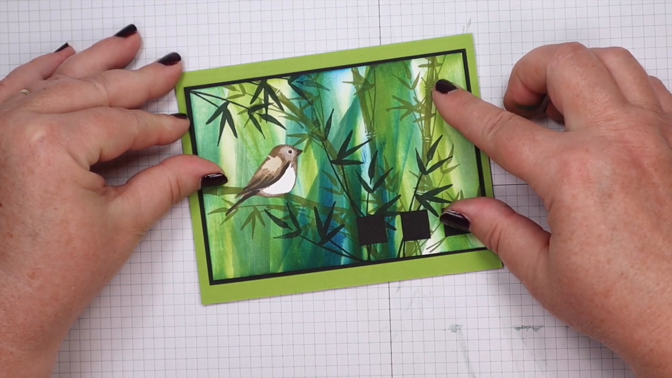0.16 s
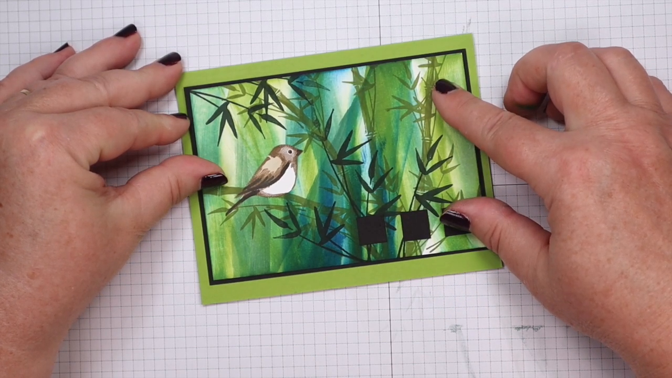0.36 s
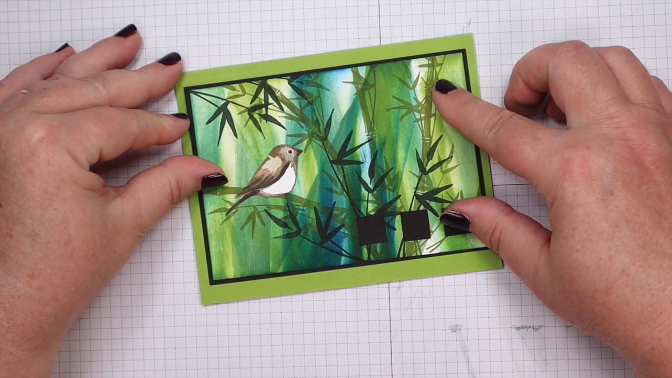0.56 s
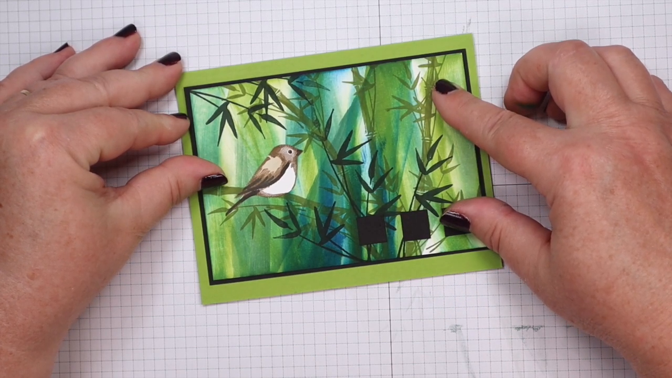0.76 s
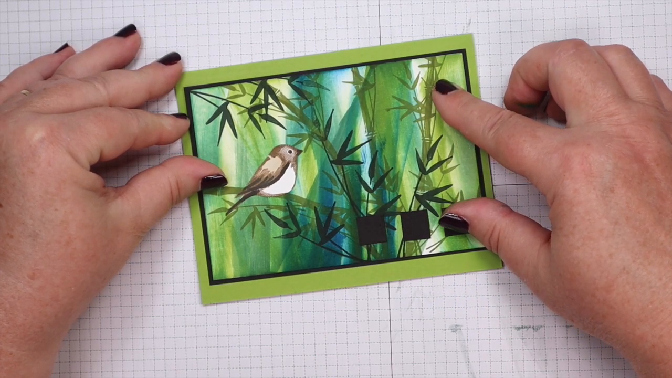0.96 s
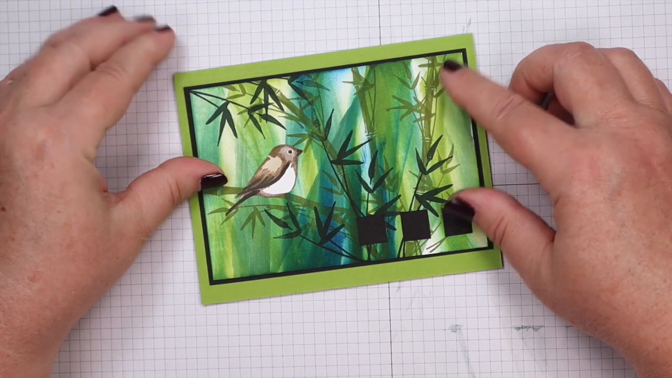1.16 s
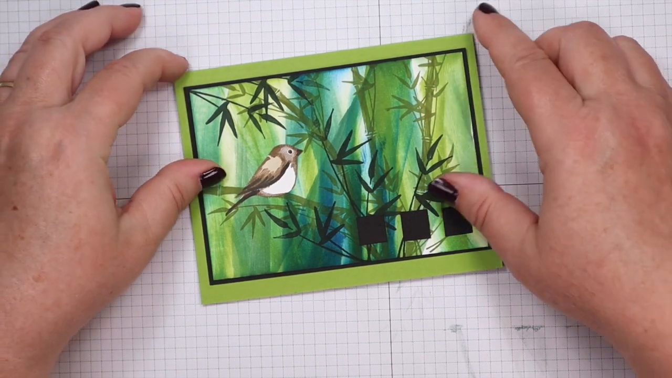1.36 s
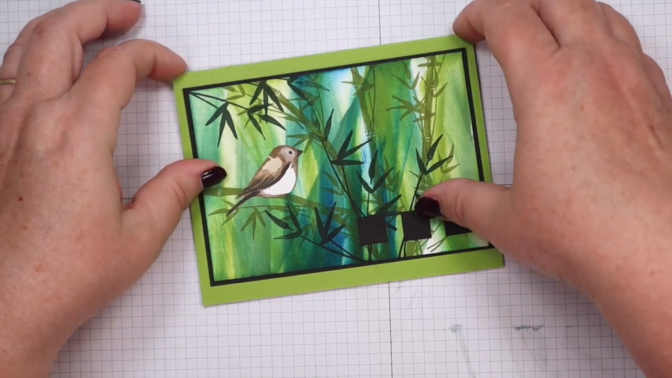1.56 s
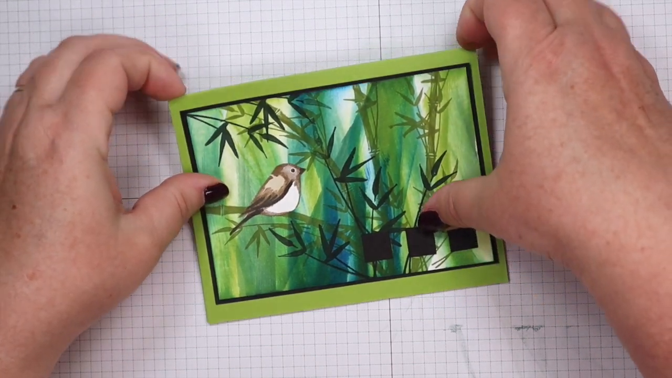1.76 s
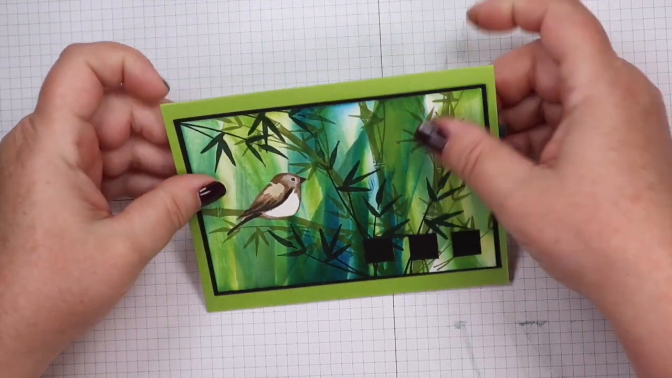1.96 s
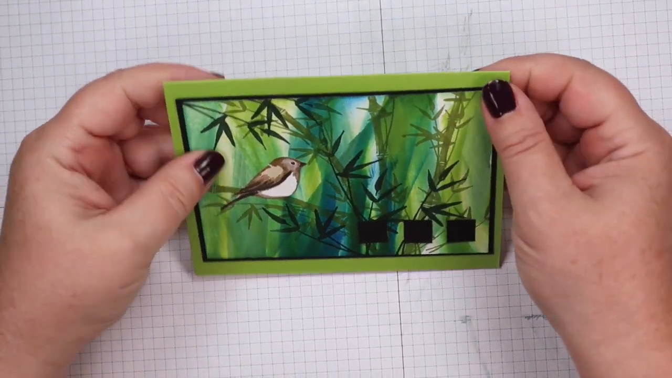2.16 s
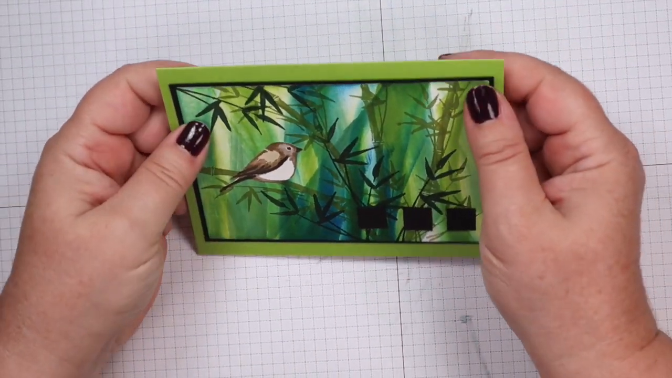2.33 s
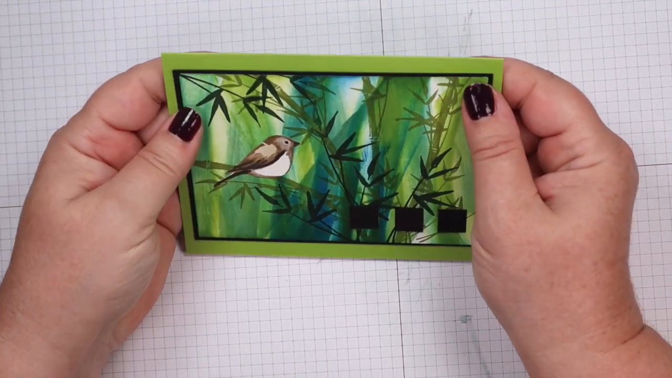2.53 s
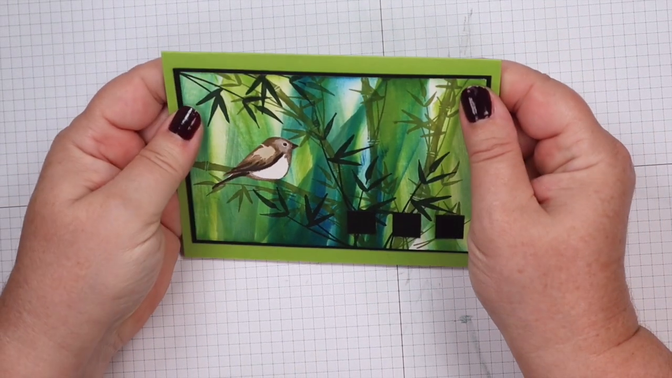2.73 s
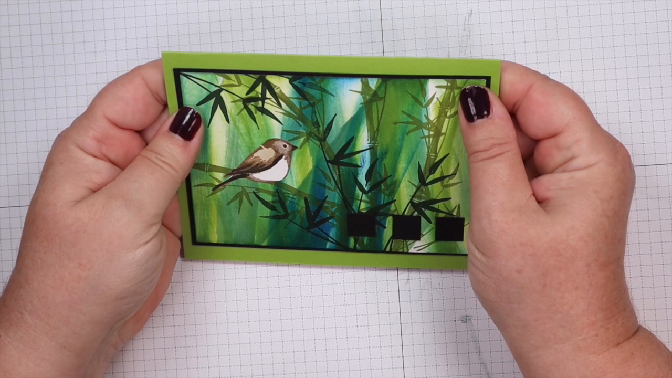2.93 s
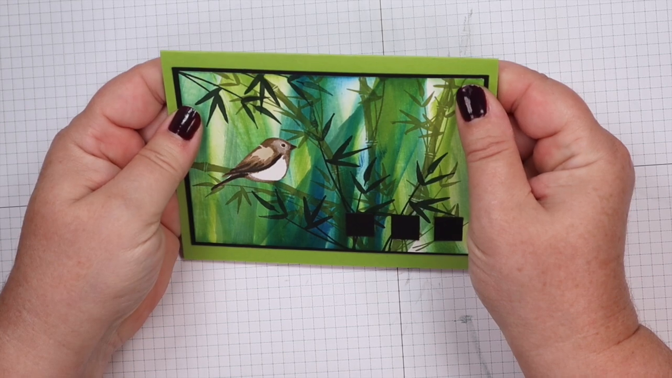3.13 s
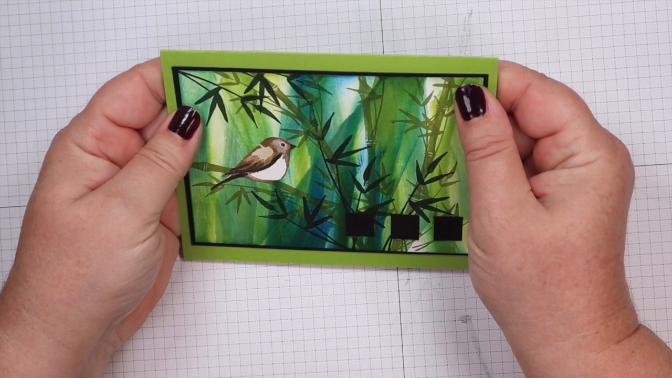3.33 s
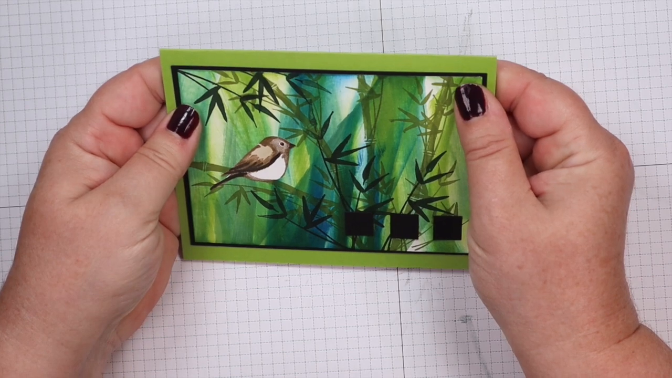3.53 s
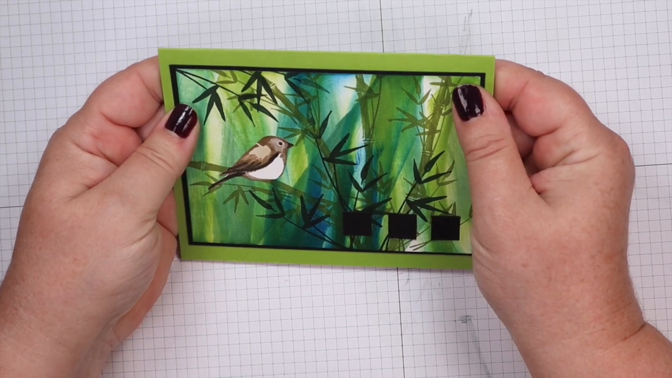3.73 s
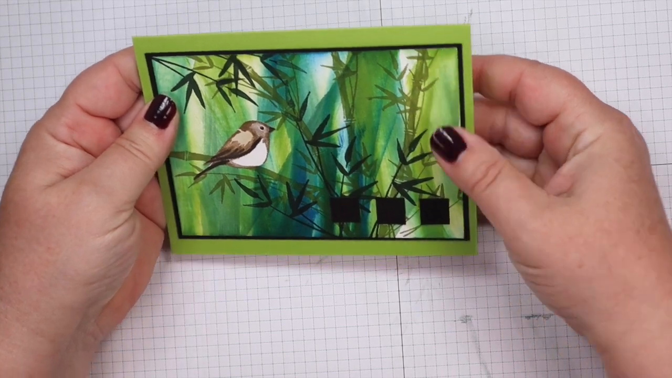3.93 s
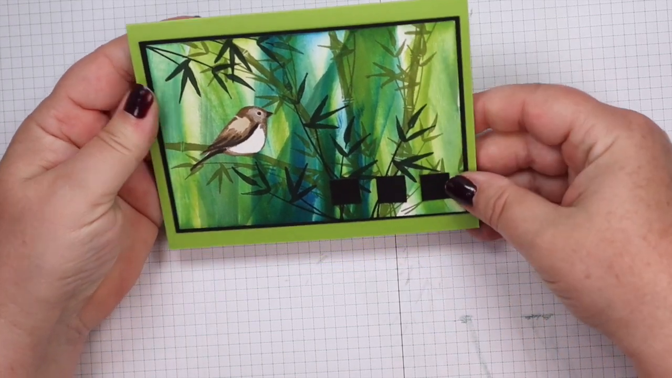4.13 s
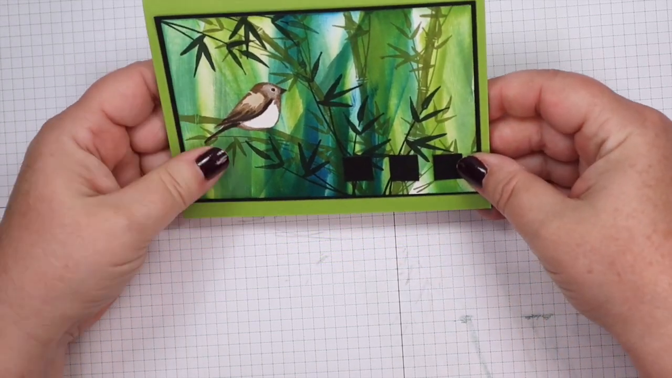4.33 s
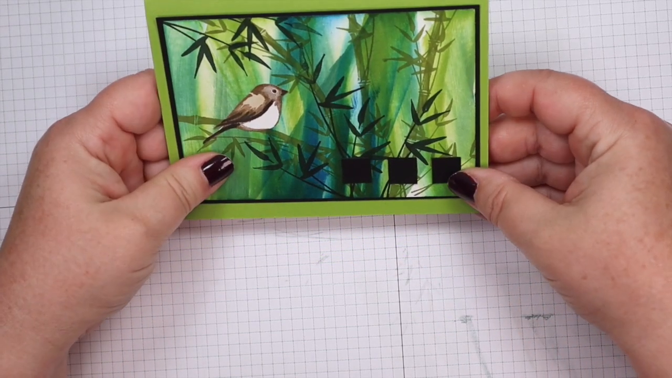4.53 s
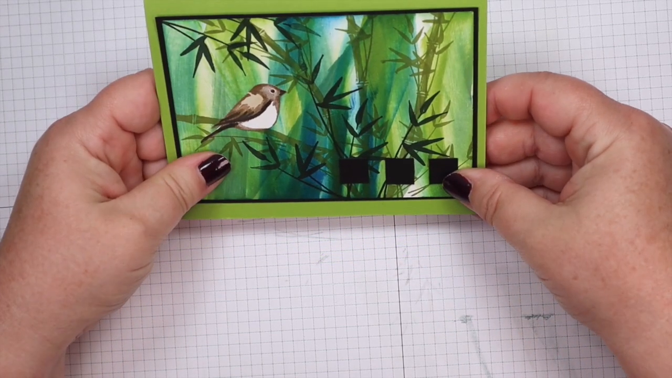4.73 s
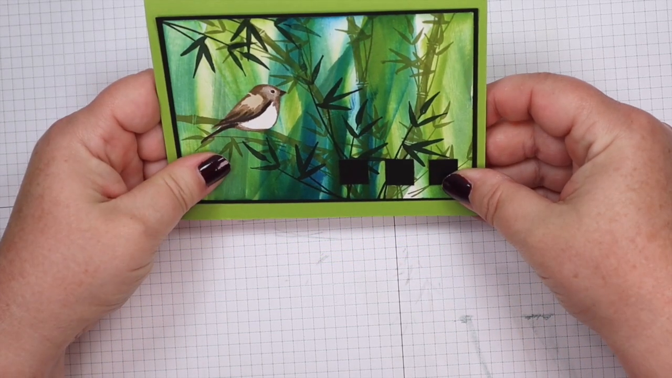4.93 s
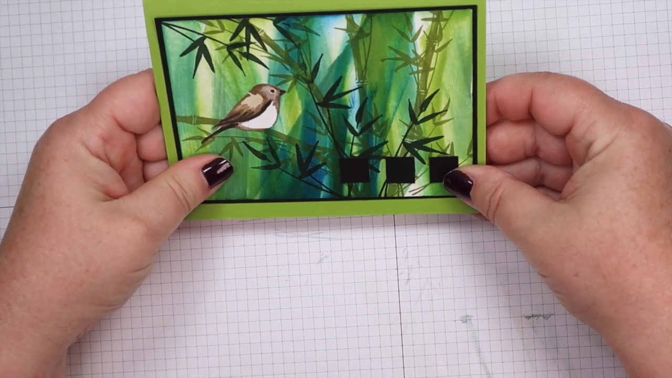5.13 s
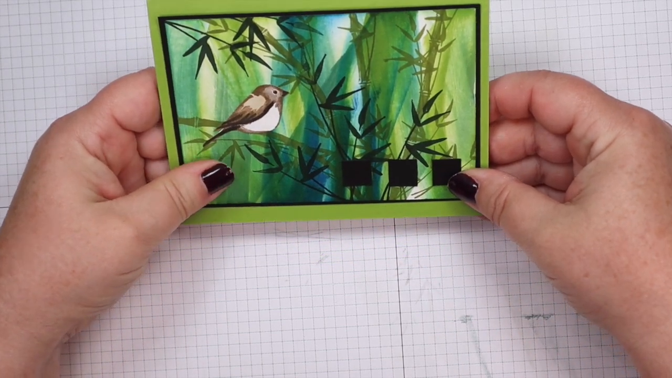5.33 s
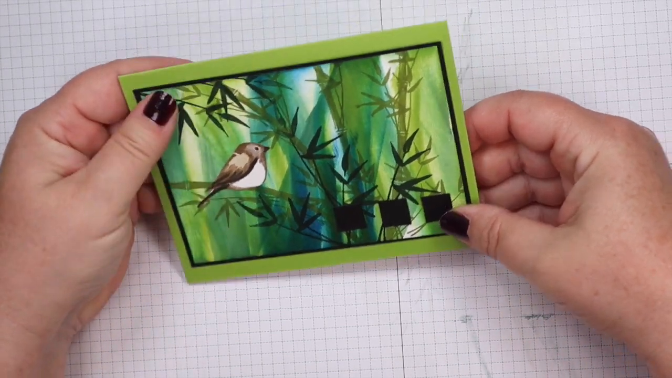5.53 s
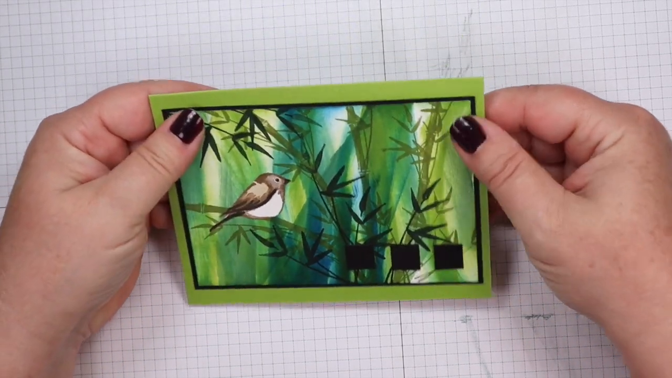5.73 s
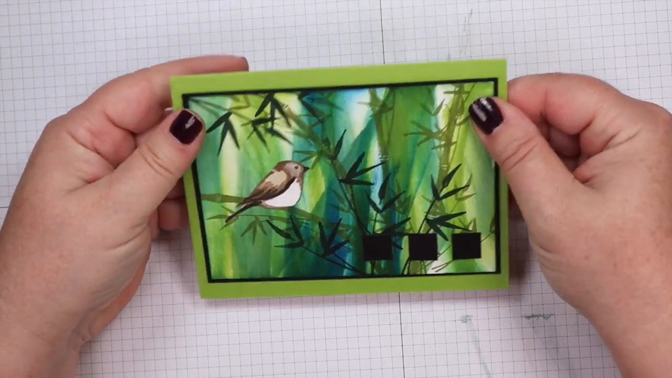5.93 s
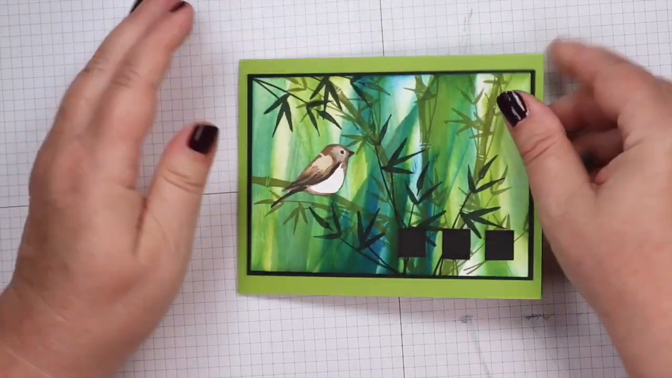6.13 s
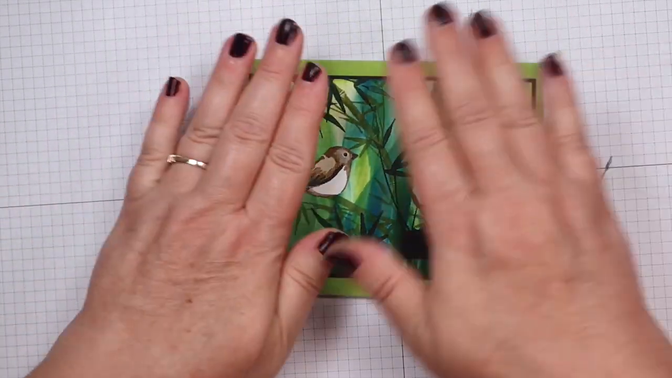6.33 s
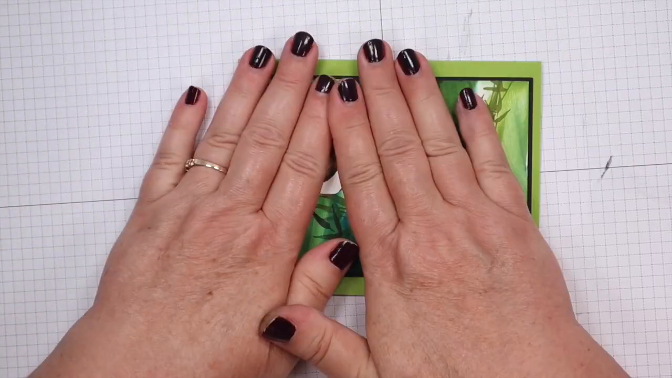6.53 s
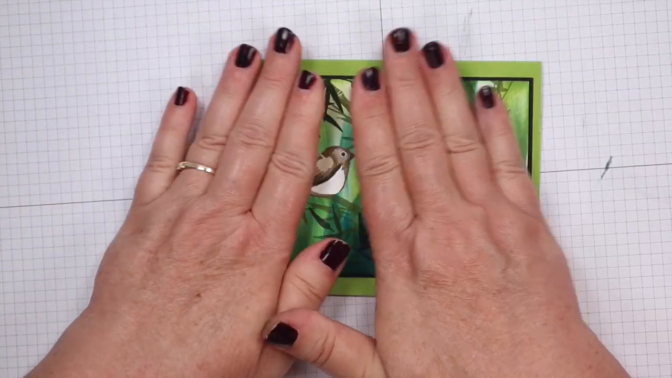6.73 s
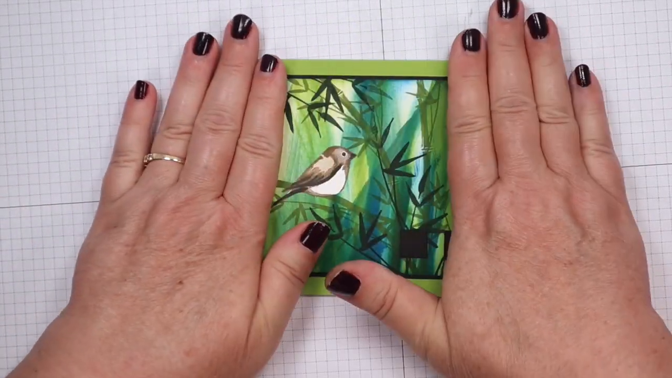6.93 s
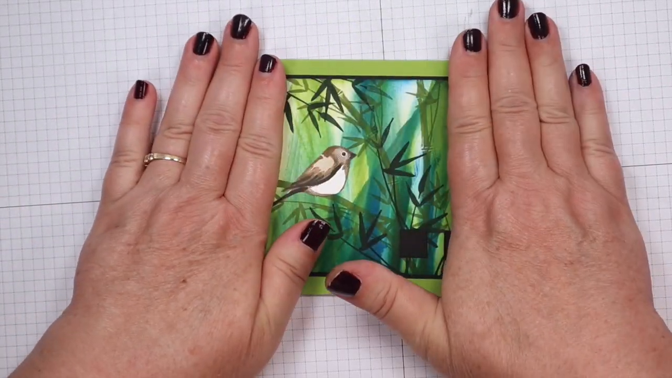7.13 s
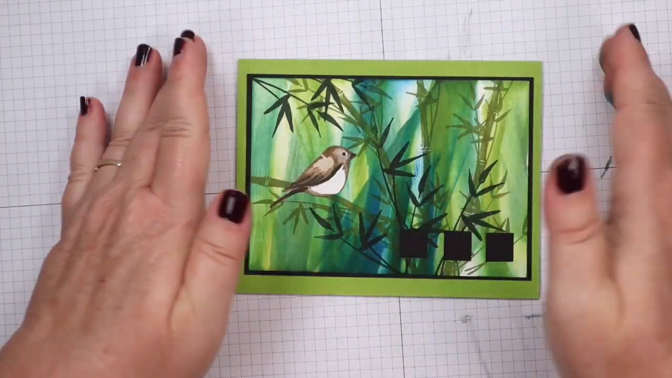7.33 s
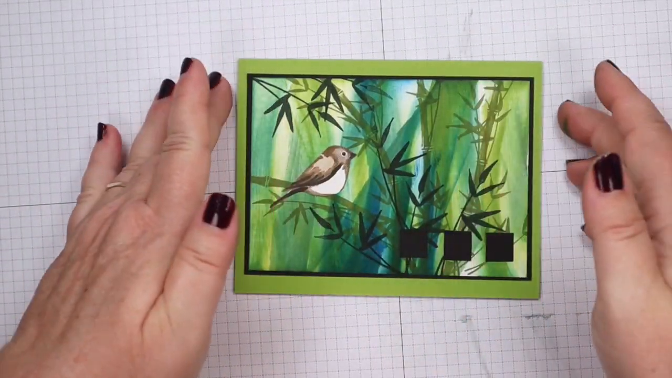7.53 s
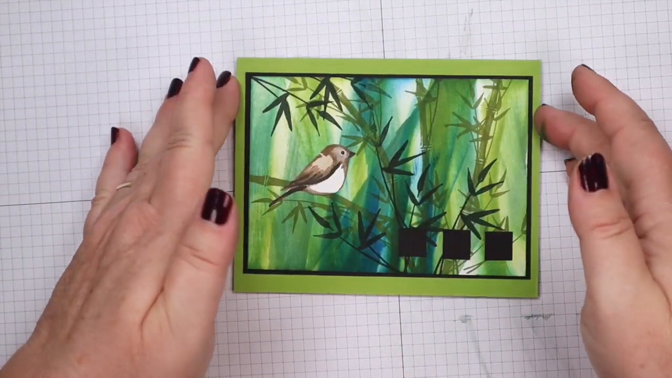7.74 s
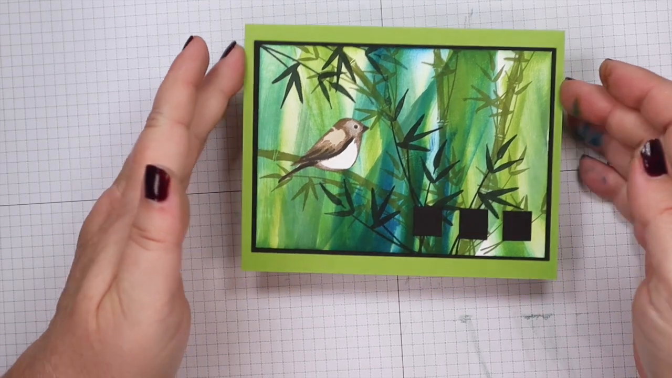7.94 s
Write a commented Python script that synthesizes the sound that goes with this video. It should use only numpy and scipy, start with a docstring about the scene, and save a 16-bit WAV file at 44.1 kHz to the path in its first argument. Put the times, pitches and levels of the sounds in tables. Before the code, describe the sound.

Paper card softly scuffed, tapped and turned by fingers, set down with a sharp click and pressed with thuds, over a steady low mains hum.

```python
"""A mains hum with a faint buzz runs through a small quiet room, with air hiss and a wavering drone.
Two hands lift a layered paper card off a craft mat, turn it, lay it down, press it flat and pick it up.
Taps are clicks and scuffs through the card's resonances; rubbing is grains of friction shaped by strokes.
Presses thud in the table top and shake the camera mount, dragged skin makes bending modes sing, and
fingernails flick the stiff edge so that its damped modes ring."""
import sys
import numpy as np
from scipy import signal
from scipy.fft import rfft, irfft
from scipy.io import wavfile
from scipy.ndimage import uniform_filter1d

SR = 44100
rng = np.random.default_rng(int(sys.argv[2]) if len(sys.argv) > 2 else 0)


def store_pcm(level_fs):
    """Save levels as 16-bit WAV."""
    pcm = np.round(np.clip(level_fs, -1, 1) * 32767).astype(np.int16)
    wavfile.write(sys.argv[1], SR, np.atleast_2d(pcm).T)


N = 356636
TIME, BINS = np.arange(N) / SR, np.fft.rfftfreq(N, 1 / SR)  # s, Hz


def amp(db):
    """Decibel law: converts a level to an amplitude gain."""
    return 10 ** (np.asarray(db) / 20)


def unit(x):
    """Normalization: scales a signal to rms 1."""
    return x / np.sqrt(np.mean(x ** 2) + 1e-20)


def read(points, hz):
    """Spectral interpolation: reads a curve on a log-frequency axis."""
    f, value = np.transpose(points)
    return np.interp(np.log(hz + 1), np.log(f + 1), value)


def add(mix, start_s, sound):
    """Superposition: adds a sound into the mix at its start time."""
    part = mix[round(start_s * SR):][:len(sound)]
    part += sound[:len(part)]


def colour(x, db):
    """Linear filtering: weights a full-length signal's spectrum, then sets rms 1."""
    return unit(irfft(rfft(x) * amp(db), N))


def wander(rate_hz):
    """Low-passed noise: a slow random fluctuation of rms 1."""
    return colour(rng.standard_normal(N), -10 * np.log10(1 + (BINS / rate_hz) ** 6))


def causal(db):
    """Minimum phase: the sharp-fronted impulse response of a spectrum, with energy 1."""
    log_gain = np.log(amp(np.r_[db, db[-2:0:-1]]))
    response = np.fft.ifft(np.exp(np.conj(signal.hilbert(log_gain)))).real
    return response / np.linalg.norm(response)


def lift_db(resonances, hz):
    """Resonance: each entry lifts, or if negative cuts, a band around its centre."""
    return sum(db / (1 + (2 * (hz - f) / width) ** 2) for f, width, db in resonances)


MAINS_HZ = 59.993
# strong odd harmonics of the mains: pitch_hz, level_db (rms of a line at that pitch)
HUM_ODD = [(60, -40.5), (180, -51), (300, -59), (420, -69.5), (540, -76.5), (660, -72.5), (780, -75.5),
           (900, -80.5), (1140, -83), (1450, -94.5), (1750, -87), (2250, -100), (2700, -93), (4000, -108)]
# weak even harmonics of the mains: pitch_hz, level_db (rms of a line at that pitch)
HUM_EVEN = [(120, -79.5), (240, -76), (360, -76.5), (480, -85.5), (840, -84.5), (1200, -115), (4000, -112)]


def hum(shift_rad=3.96, shift_falloff=0.73):
    """Fourier synthesis: high odd harmonics align in a spike each half cycle; low ones are shifted off it."""
    turns = MAINS_HZ * (TIME - .00515)
    cycle, orders = np.linspace(0, 1, 2049), np.arange(1, 66)
    odd = orders % 2
    line_db = np.where(odd, read(HUM_ODD, orders * MAINS_HZ), read(HUM_EVEN, orders * MAINS_HZ))
    random_phase = 2 * np.pi * rng.random(len(orders))
    shift = np.where(odd, shift_rad / orders ** shift_falloff, random_phase)
    lines = np.cos(2 * np.pi * np.outer(orders, cycle) + shift[:, None])
    wave = -np.sqrt(2) * amp(line_db) @ lines
    return np.interp(turns % 1, cycle, wave)


# faint drone in the room: pitch_hz, level_db (rms)
DRONE = [(110, -71), (139, -70), (220, -81.5), (242, -78), (468, -84.5)]
# spectrum of the room air and microphone hiss: pitch_hz, relative level_db (per Hz)
AIR = [(10, -22.5), (30, 4.5), (70, 0.5), (110, -4), (140, -7), (175, -8.5), (240, -8), (340, -14.5),
       (700, -15.5), (1300, -20), (2500, -24.5), (5000, -26.5), (10000, -29.5), (16000, -31)]


def background(air_db=-63, waver_rad=1.0):
    """Stationary noise and phase modulation: room air, microphone hiss and a wavering drone."""
    drone = np.zeros(N)
    for hz, db in DRONE:
        phase = 2 * np.pi * hz * TIME + waver_rad * wander(rate_hz=4.1)
        drone += np.sqrt(2) * amp(db) * np.sin(phase)
    return drone + amp(air_db) * colour(rng.standard_normal(N), read(AIR, BINS))


# contacts of card, mat and fingers: start_s, relative level_db, brightness_db_per_octave,
# decay_s (of the scuff that follows)
TAPS = [(.106, -45.5, -8.5, 0.021), (0.39, -39, -8, .002), (.842, -32, 1, 0.0011), (.849, -38, 0, 0.0017),
        (.864, -39, 3, 0.0018), (.884, -37.5, 3, .001), (1.159, -29.5, 3.5, 0.0033), (1.162, -30, 7, .0064),
        (1.169, -36, 0, 0.0034), (1.426, -26, 22, .0027), (1.5279, -30, 3.5, 0.0011),
        (1.835, -34, -3, .004), (2.94, -42, -4, 0.0043), (3.865, -37, 0, 0.002), (4.177, -40, 1, 0.0056),
        (4.486, -43, 3, 0.0034), (5.325, -40.5, 1, 0.0047), (6.1989, -12.5, 0.5, 0.00093),
        (6.2004, -22.5, -0.5, 0.0019), (6.2363, -25, -2, 0.0018), (6.464, -42, -2, 0.0053),
        (6.4694, -30, 0.5, 0.0053), (6.5106, -28, 2, 0.0019), (6.514, -24, -2, 0.0012),
        (6.5194, -27.5, 4, .0011), (6.748, -34, 6.5, 0.00082), (6.775, -33, -4.5, 0.0011),
        (6.945, -29, -2, 0.0057), (7.189, -39.5, 2, 0.0024), (7.367, -31, 9, .001)]
# spectrum of a tap: pitch_hz, relative level_db
TAP = [(100, -13), (400, -8), (900, -6.5), (1500, -1.5), (2500, -4), (3900, 2.5), (5500, -7), (7000, -11.5),
       (10000, -18), (16000, -27)]
# resonances and one notch of the card struck against the mat: pitch_hz, width_hz, lift_db (hardest contact)
STRUCK = [(630, 48, 14), (1360, 200, 2), (2110, 62, 5.5), (2480, 250, 8.5), (3300, 240, 3),
          (3920, 610, -16), (5400, 550, 7.5), (11700, 1400, 9)]


def taps(scuff=0.18, soft_s=0.0049, contact_s=.00005, rise_s=0.00027):
    """Impact excitation: a click and a scuff; long, soft contacts hardly click and damp the card's ring."""
    out, hz, t = np.zeros(N), np.fft.rfftfreq(2048, 1 / SR), np.arange(2048) / SR
    click = np.exp(-t / contact_s)
    click /= click.sum()
    for start, db, brightness, decay in TAPS:
        hardness = np.exp(-decay / soft_s)
        scuff_shape = np.exp(-t / decay) * (1 - np.exp(-t / rise_s))
        scuffing = scuff * np.sqrt(1 - hardness) * rng.standard_normal(len(t)) * scuff_shape
        force = hardness * click + scuffing
        tilt_db = brightness * np.log2(np.maximum(hz, 400) / 2500)  # flat below 400 Hz
        body = causal(read(TAP, hz) + hardness * lift_db(STRUCK, hz) + tilt_db)
        add(out, start, amp(db) * signal.fftconvolve(force, body))
    return out


def reflections(x, near_db=-11):
    """Early reflection: sharp taps bounce straight back from the table and the hands."""
    response = np.zeros(SR // 100)
    for delay_s, share in [(.00099, 0.36), (.0026, 0.37), (.0036, .6)]:
        response[round(delay_s * SR)] += share * amp(near_db)
    return x + signal.fftconvolve(x, response)[:N]


ATTACK_S, ATTACK_SHARE = 0.017, 0.23  # the longer the stroke, the more gently it starts
SAG_DB, RELEASE_S = -1, 0.034  # it eases off along its length and lets go
LINGER_DB, LINGER_S = -5.5, 0.1  # the fingertip goes on brushing lightly


def stroke(start, length):
    """Pressure envelope: a slide's attack, sagging hold and release into a light brush."""
    t = np.maximum(TIME - start, 0)
    bite = np.sin(np.pi / 2 * np.minimum(t / (ATTACK_S + ATTACK_SHARE * length), 1)) ** 2
    sag = amp(SAG_DB * np.minimum(t / length, 1))
    after = np.maximum(t - length, 0)
    release = np.maximum(np.exp(-after / RELEASE_S), amp(LINGER_DB) * np.exp(-after / LINGER_S))
    return bite * sag * release


# resonances and two dips of the card sheet: pitch_hz, width_hz, lift_db
SHEET = [(636, 46, 2.5), (1203, 400, -3.5), (1790, 270, -3.5), (2125, 54, 1), (2820, 270, 0.5),
         (3600, 550, 7), (5400, 2100, 4)]


def friction(spectrum, grains_per_s, spread_db, smooth, patchy_db):
    """Stick-slip: paper fibres catch and let go; fingers damping parts of the sheet make the colour drift."""
    sizes = amp(spread_db * np.minimum(rng.exponential(1, N), 4)) * rng.choice([-1, 1], N)
    grains = unit(sizes * (rng.random(N) < grains_per_s / SR))
    catches = grains + smooth * rng.standard_normal(N)
    z = signal.stft(catches, nperseg=512)[2]
    # random gains, smoothed over frequency and then over time
    patches = uniform_filter1d(rng.standard_normal(z.shape), size=4, axis=0)
    patches = unit(uniform_filter1d(patches, size=14, axis=1))
    drifting = signal.istft(z * amp(patchy_db * patches), nperseg=512)[1][:N]
    return colour(drifting, read(spectrum, BINS) + lift_db(SHEET, BINS))


# spectrum of the card's scrape, also of snags and nail snaps: pitch_hz, relative level_db (per Hz)
SCRAPE = [(300, -45), (800, -6), (1300, 0), (2500, -1), (3600, -6), (5500, -6), (7500, -20.5), (16000, -29)]


def snags(per_s=24, level_db=-8, decay_s=.002, spread_db=3):
    """Impulsive friction: now and then a sliding finger catches on an edge with a small tick."""
    t = np.arange(1024) / SR
    catches = amp(spread_db * rng.uniform(-1.1, 1, N)) * (rng.random(N) < per_s / SR)
    bursts = signal.fftconvolve(catches, np.exp(-t / decay_s))[:N] * rng.standard_normal(N)
    return amp(level_db) * colour(bursts, read(SCRAPE, BINS))


# spectrum of the hiss of skin: pitch_hz, relative level_db (per Hz)
SKIN = [(1000, -1.5), (3000, -4), (5000, -2), (7000, -1.5), (12000, -1.5), (16000, -9)]
# spectrum of the hollow rub against the mat: pitch_hz, relative level_db (per Hz)
HOLLOW = [(150, -22), (250, 0), (460, -10.5), (560, 4), (700, -0.5), (900, -6), (1170, -2), (1450, -10.5),
          (4000, -44)]
# finger strokes over the card, before the layer gains: start_s, length_s, scrape level_db,
# skin hiss level_db (relative to the scrape)
STROKES = [(1.176, 0.04, -60, -1), (1.3, 0.24, -66.5, -3), (1.53, 0.15, -64.5, -4.5),
           (1.717, 0.064, -58.5, 1), (1.787, 0.19, -65, -1), (1.968, .075, -53.5, -1.5),
           (2.038, 0.069, -58, -6), (2.119, 0.076, -55, -6), (2.22, 0.065, -62.5, -0.5),
           (2.313, 0.11, -60, -6.5), (2.42, 0.079, -55, -7.5), (2.58, 0.038, -58.5, -5),
           (3.789, 0.36, -67.5, 0), (4.226, 0.22, -68.5, 1.5), (5.287, 0.16, -69.5, -3),
           (5.428, 0.11, -71, 7), (5.533, 0.026, -57.5, -3.5), (5.637, 0.13, -67.5, -0.5),
           (5.76, 0.041, -64, -2.5), (5.9, 0.064, -71, 1.5), (6.075, .08, -67.5, -2.5),
           (6.153, 0.069, -62, 1), (6.335, 0.051, -63.5, -2), (6.446, 0.072, -61.5, -6),
           (6.738, 0.073, -61, -4), (6.867, 0.078, -60.5, -5.5), (7.203, 0.18, -63.5, -3),
           (7.377, 0.15, -68.5, -0.5), (7.55, .3, -66.5, -7.5), (7.885, 0.1, -53.5, -9.5)]
# the card shifts on the mat, before the layer gain: start_s, length_s, hollow rub level_db
SHIFTS = [(0.835, 0.038, -61), (1.177, 0.029, -55), (1.306, .1, -55.5), (1.525, 0.042, -62),
          (1.75, 0.064, -59.5), (2.443, 0.077, -63), (5.595, 0.026, -65), (5.772, .02, -68),
          (7.497, 0.027, -58.5), (7.593, 0.062, -63), (7.747, .045, -61)]
HOLLOW_SHARE_DB = -15  # every stroke also works the card against the mat a little


def rubbing(scrape_db=0.0, skin_db=3.0, hollow_db=1.0, unsteady_db=1.5):
    """Addition of power: strokes drive the card's scrape, the hiss of skin and the hollow rub on the mat."""
    scrape_power, skin_power = np.zeros((2, N))
    for start, length, db, hiss_db in STROKES:
        power = (amp(db) * stroke(start, length)) ** 2
        scrape_power += power
        skin_power += power * amp(hiss_db) ** 2
    hollow_power = scrape_power * amp(HOLLOW_SHARE_DB) ** 2
    for start, length, db in SHIFTS:
        hollow_power += (amp(db) * stroke(start, length)) ** 2

    scrape = friction(SCRAPE, grains_per_s=3000, spread_db=-1.5, smooth=0.77, patchy_db=1.5)
    scrape = np.sqrt(scrape_power) * (amp(scrape_db) * scrape + snags())
    skin = friction(SKIN, grains_per_s=4300, spread_db=0.0, smooth=0.6, patchy_db=2.6)
    skin = np.sqrt(skin_power) * amp(skin_db) * skin
    hollow = friction(HOLLOW, grains_per_s=900, spread_db=3.5, smooth=0.53, patchy_db=2.1)
    hollow = np.sqrt(hollow_power) * amp(hollow_db) * hollow
    return (scrape + skin + hollow) * amp(unsteady_db * wander(rate_hz=35))


# spectrum of a soft blow on the table top: pitch_hz, relative level_db (per Hz)
THUD = [(40, -13), (110, 5.5), (240, 0), (340, -1), (430, 0.5), (700, -9), (1300, -8.5), (4000, -37)]
# spectrum of the table top's rumble: pitch_hz, relative level_db (per Hz)
RUMBLE = [(8, -2), (20, 13), (35, 3), (55, 6), (90, -8), (250, -45), (1000, -94)]
# hands and card landing on the table: start_s, thud level_db, wobble level_db (also scales the rumble)
PRESSES = [(0.861, -54.5, -74), (2.94, -67, -72), (6.209, -48, -67), (6.234, -46, -74), (6.473, -44, -40),
           (6.514, -51, -65), (6.728, -55, -58), (6.948, -46, -49)]


def presses(thud_s=0.018, wobble_hz=14.92, wobble_s=0.78, rumble_db=-3, rumble_s=0.27):
    """Damped oscillation: a blow thuds and rumbles in the table top; the camera mount wobbles, dying away."""
    out, t = np.zeros(N), np.arange(2 * SR) / SR
    thuds = colour(rng.standard_normal(N), read(THUD, BINS))
    rumbles = colour(rng.standard_normal(N), read(RUMBLE, BINS))
    wobble = np.sin(2 * np.pi * wobble_hz * t) * np.exp(-t / wobble_s)
    onset = 1 - np.exp(-t / 0.0011)
    for start, thud_db, wobble_db in PRESSES:
        # each press takes its own stretch of the noise
        thud = np.roll(thuds, -round(start * SR))[:len(t)] * np.exp(-t / thud_s)
        rumble = np.roll(rumbles, -round(start * SR))[:len(t)] * np.exp(-t / rumble_s)
        shaking = wobble + amp(rumble_db) * rumble
        add(out, start, (amp(thud_db) * thud + amp(wobble_db) * shaking) * onset)
    return out


# skin drags across the card's edge and one bending mode sings out:
# middle_s, length_s, pitch_hz, width_hz, level_db (before the flutter)
DRAGS = [(1.653, 0.15, 660, 170, -61.5), (2.031, 0.2, 1650, 650, -58), (2.166, 0.11, 1250, 300, -65),
         (2.479, 0.13, 1290, 450, -61.5), (5.349, .13, 3430, 600, -69), (5.626, 0.063, 1410, 350, -63.5),
         (5.794, 0.044, 1410, 300, -58), (7.943, 0.17, 2590, 600, -51.5), (7.951, 0.15, 1670, 300, -59.5),
         (7.958, 0.12, 5200, 900, -54), (8.06, 0.18, 3050, 900, -61.5)]


def drags(flutter_db=1.5):
    """Noise-driven resonance: each drag swells and fades, ringing the mode that the grip leaves free."""
    out = np.zeros(N)
    for middle, length, hz, width, db in DRAGS:
        pole = np.exp((2j * np.pi * hz - np.pi * width) / SR)
        noise = rng.standard_normal(SR // 4)
        ringing = unit(signal.lfilter([1], np.poly([pole, pole]), noise).real)
        swell = np.hanning(min(round(length * SR), len(ringing)))
        add(out, middle - length / 2, amp(db) * swell * ringing[:len(swell)])
    return out * amp(flutter_db * wander(rate_hz=64))


# a fingernail slips off the card's edge: start_s, relative level_db,
# low_modes_db (modes below 2500 Hz relative to the rest)
FLICKS = [(7.805, -36.5, -23), (7.816, -36.5, -13), (7.8372, -35, 3)]
# modes of the stiff edge: pitch_hz, relative level_db, t60_s (before the finger's damping)
EDGE = [(1510, -11, 0.036), (1750, -1.5, 0.028), (3200, -14, .008), (3490, 4, 0.019), (3970, -3.5, 0.015),
        (5050, -30, .02), (6370, -31, 0.017), (8430, -18, 0.027)]


def flicks(snap_db=-9, snap_s=0.0025, damped_s=0.0096):
    """Modal ringing: the card's edge snaps free of a nail and rings until the finger damps it."""
    out, t = np.zeros(N), np.arange(4096) / SR
    snaps = colour(rng.standard_normal(N), read(SCRAPE, BINS))
    for start, db, low_db in FLICKS:
        snap = snaps[round(start * SR):][:len(t)] * np.exp(-t / snap_s)
        add(out, start, amp(db + snap_db) * snap)
        for hz, mode_db, t60 in EDGE:
            fade = np.exp(-np.log(1000) * t / t60 - (t / damped_s) ** 2)
            level = amp(db + mode_db + low_db * (hz < 2500))
            add(out, start, level * fade * np.sin(2 * np.pi * hz * t))
    return out


# decay of the room's tail: pitch_hz, t60_s
ROOM = [(150, 0.33), (1000, 0.35), (5000, 0.096), (15000, 0.15)]


def room(x, tail_db=-14):
    """Reverberation: a short faint tail of sparse echoes, each band dying at its own speed."""
    size = SR // 2
    echoes = rng.choice([-1., 1.], size) * (rng.random(size) < 3000 / SR)  # about 3000 per second
    echoes = echoes * (np.arange(size) > .006 * SR)  # none in the first 6 ms
    hz, t, z = signal.stft(echoes, SR, nperseg=256)
    decay = np.exp(-np.log(1000) * t / read(ROOM, hz)[:, None])
    tail = signal.istft(z * decay, SR, nperseg=256)[1]
    return x + amp(tail_db) * signal.fftconvolve(x, tail / np.linalg.norm(tail))[:N]


def scene():
    """Superposition: the handling in the room, over hum and air."""
    handling = reflections(amp(4.0) * taps()) + amp(-1.0) * rubbing() + presses()
    handling += drags() + amp(-2.0) * flicks()
    return (hum() + background() + room(handling))[None]


CUTOFF_HZ = 15900


def record(dry):
    """Band limiting: the recorder's linear-phase low-pass filter removes the highest treble."""
    lowpass = signal.firwin(511, CUTOFF_HZ, window=("kaiser", 9), fs=SR)
    return signal.oaconvolve(dry, lowpass[None], "same")


dry = scene()
out = record(dry)
store_pcm(out)
```